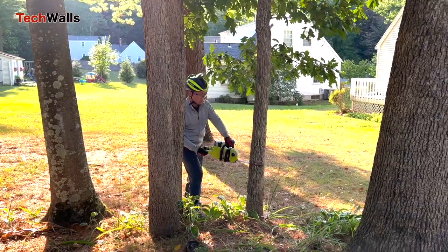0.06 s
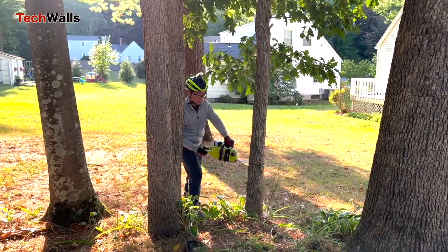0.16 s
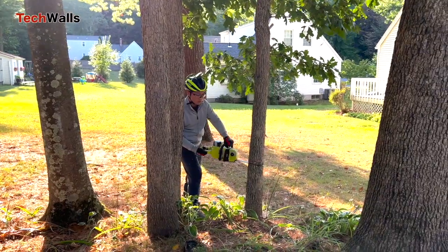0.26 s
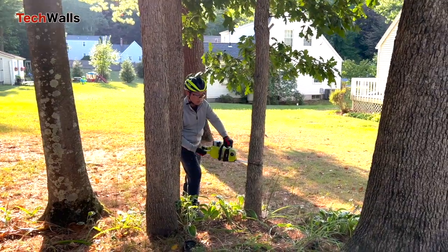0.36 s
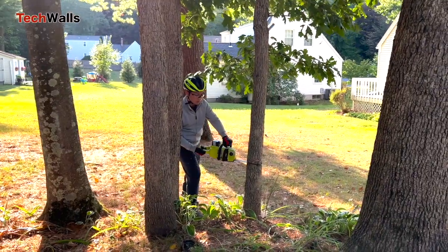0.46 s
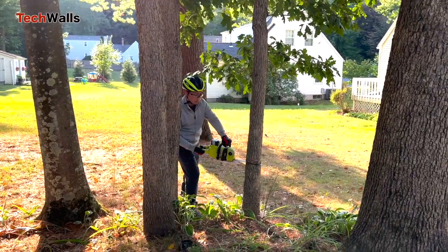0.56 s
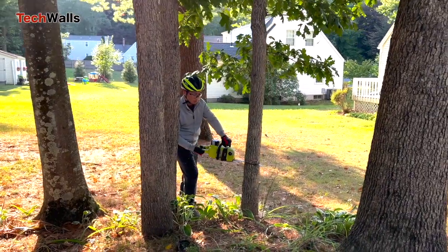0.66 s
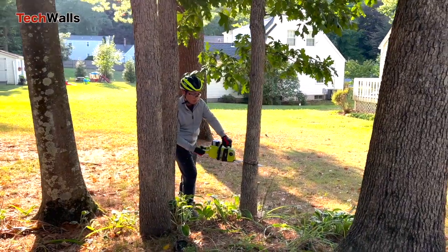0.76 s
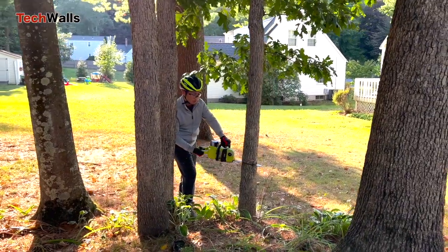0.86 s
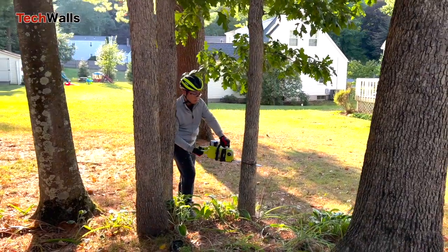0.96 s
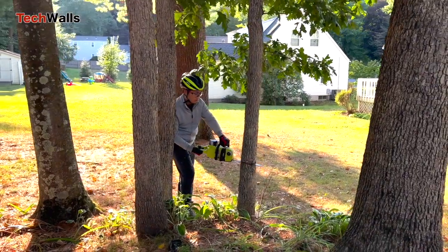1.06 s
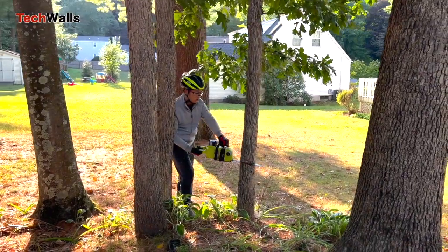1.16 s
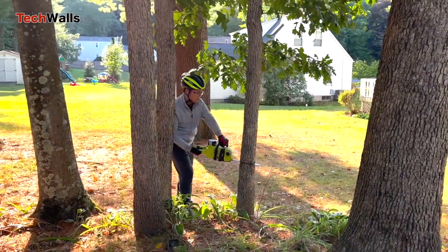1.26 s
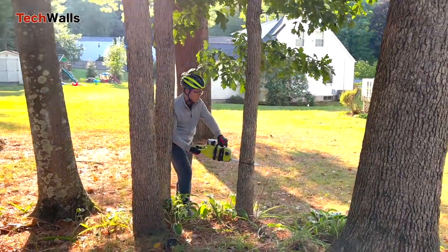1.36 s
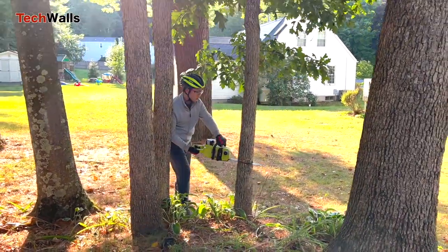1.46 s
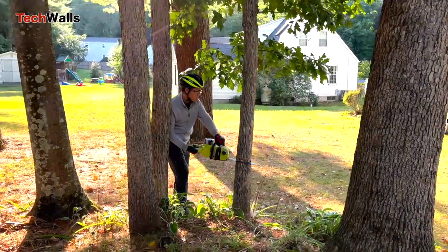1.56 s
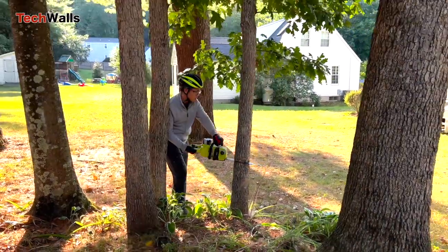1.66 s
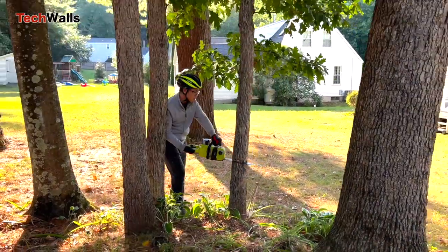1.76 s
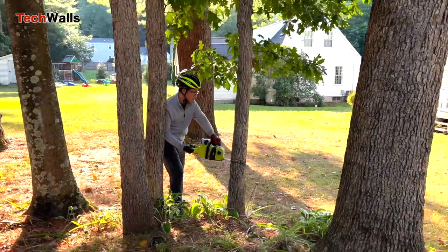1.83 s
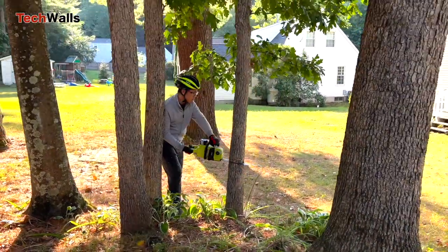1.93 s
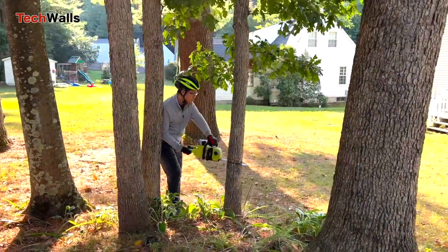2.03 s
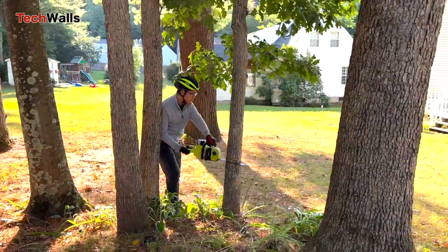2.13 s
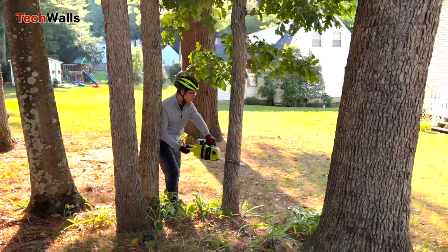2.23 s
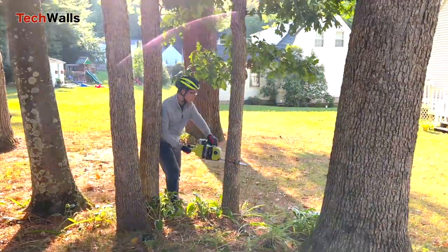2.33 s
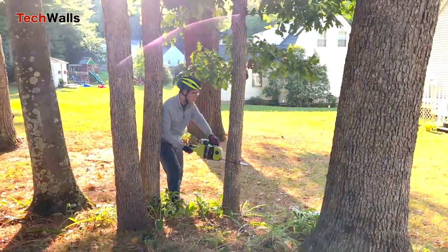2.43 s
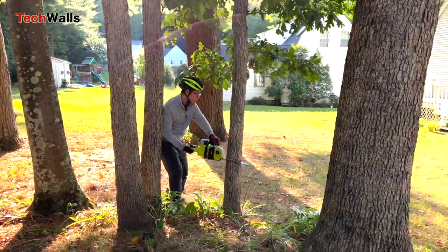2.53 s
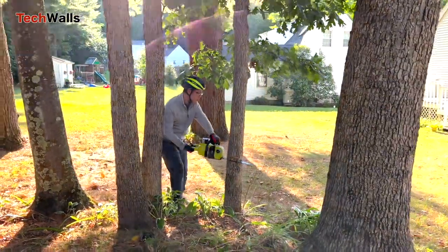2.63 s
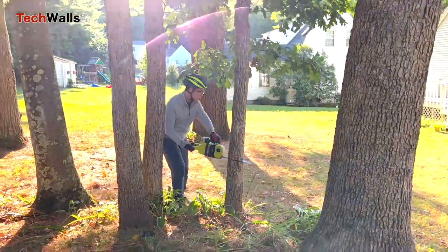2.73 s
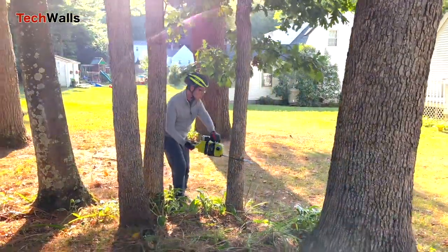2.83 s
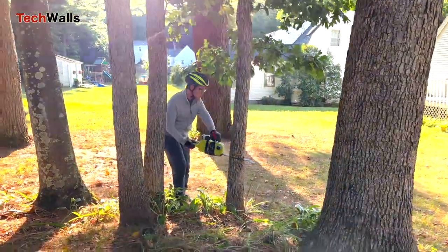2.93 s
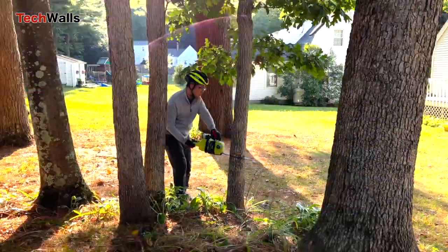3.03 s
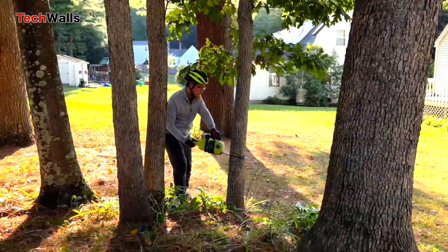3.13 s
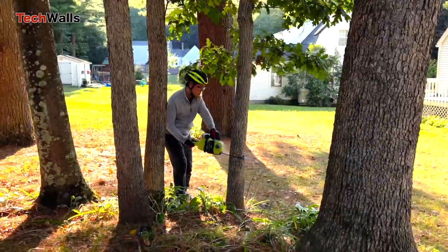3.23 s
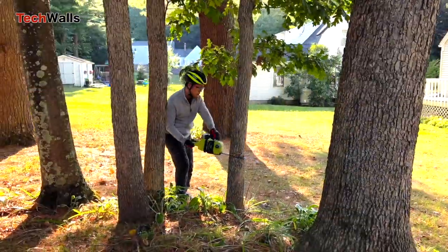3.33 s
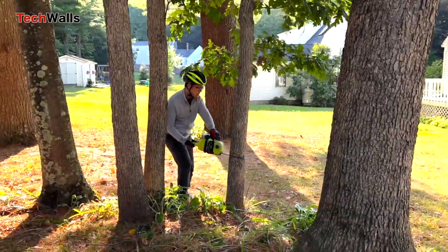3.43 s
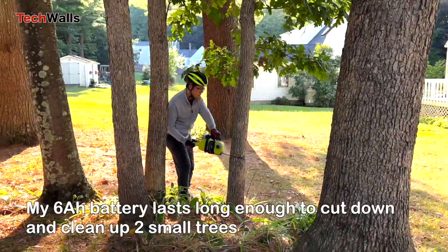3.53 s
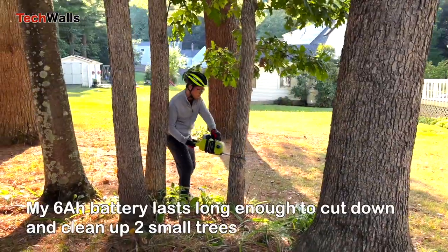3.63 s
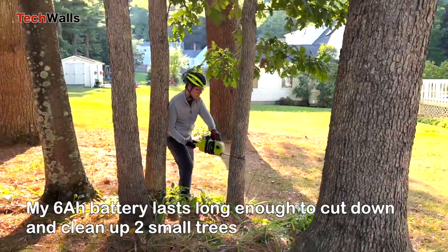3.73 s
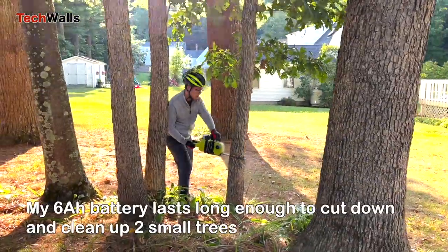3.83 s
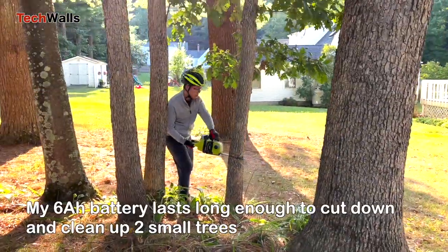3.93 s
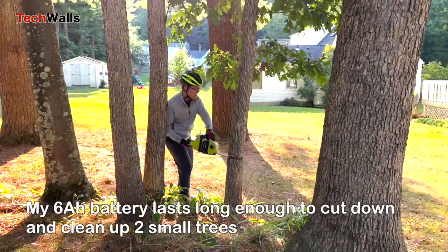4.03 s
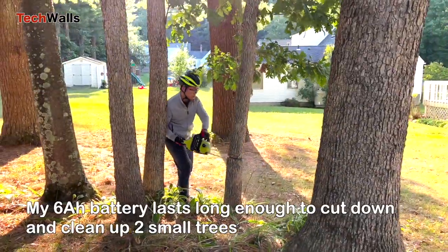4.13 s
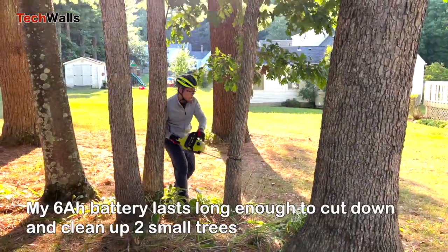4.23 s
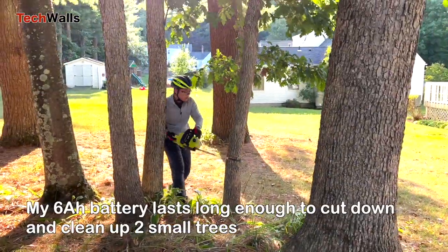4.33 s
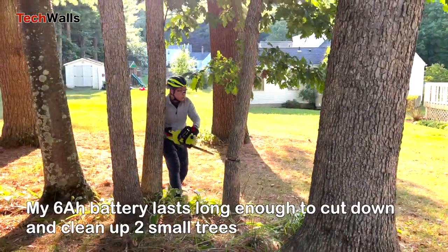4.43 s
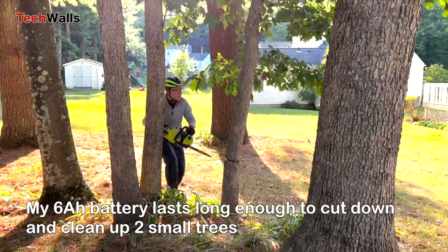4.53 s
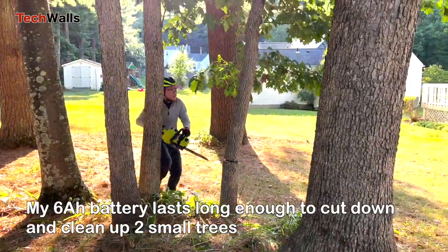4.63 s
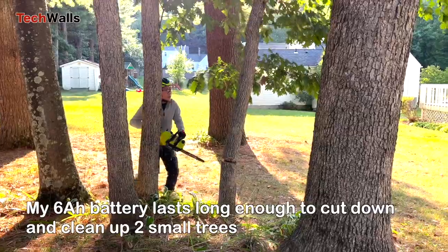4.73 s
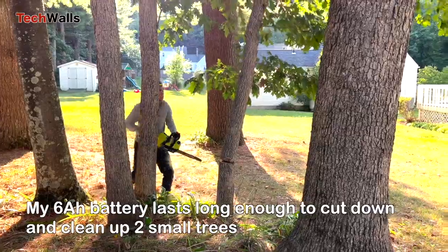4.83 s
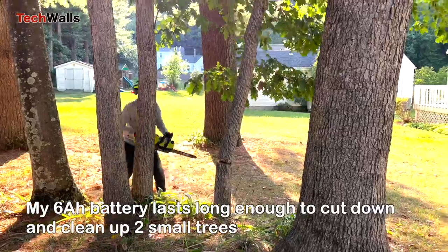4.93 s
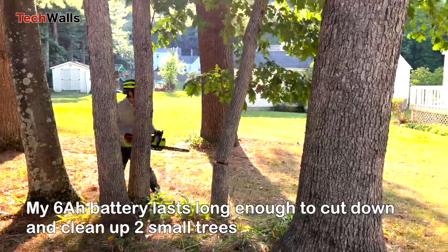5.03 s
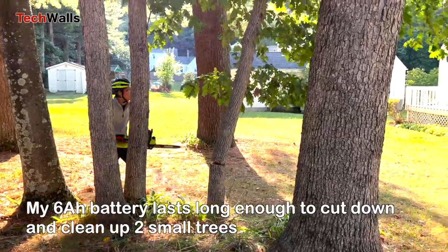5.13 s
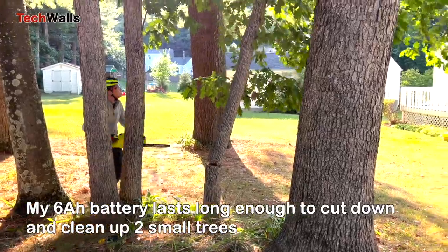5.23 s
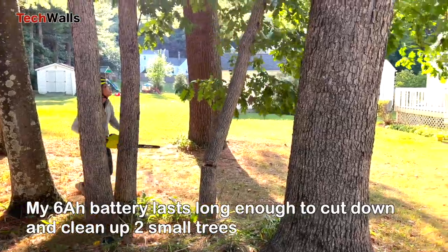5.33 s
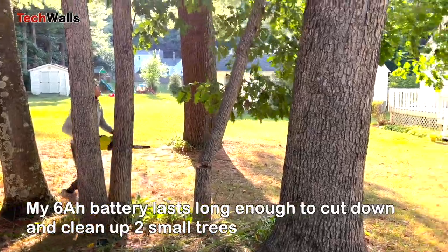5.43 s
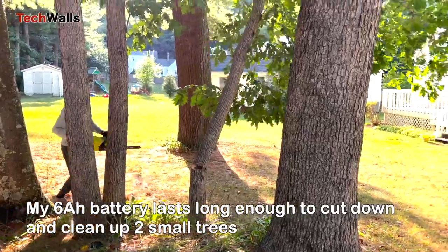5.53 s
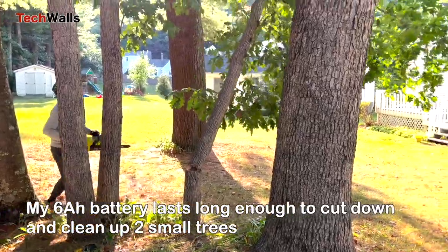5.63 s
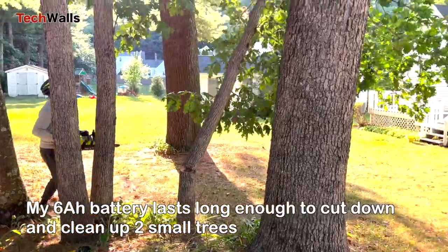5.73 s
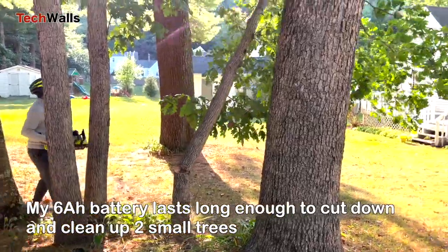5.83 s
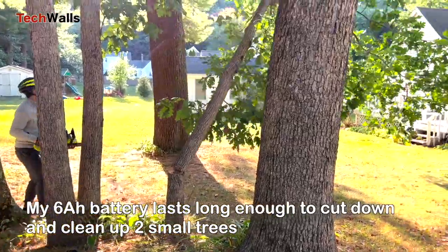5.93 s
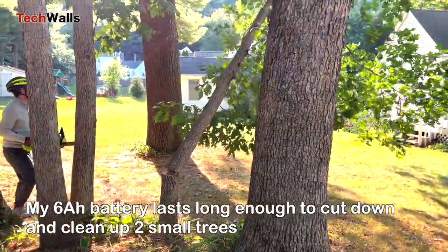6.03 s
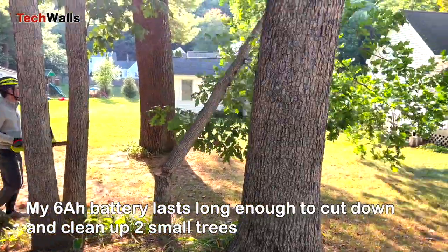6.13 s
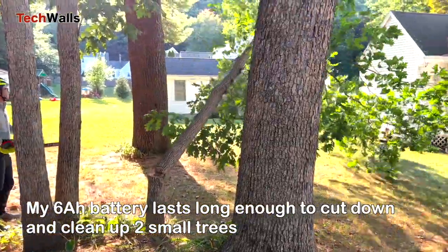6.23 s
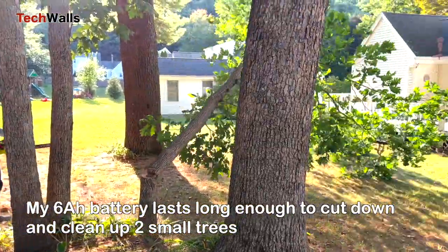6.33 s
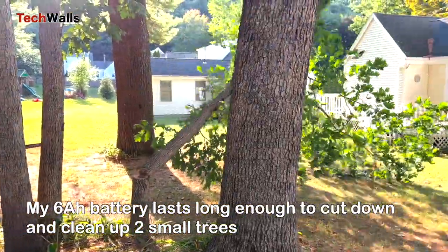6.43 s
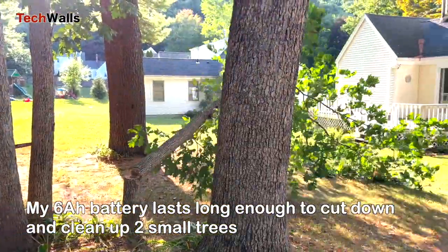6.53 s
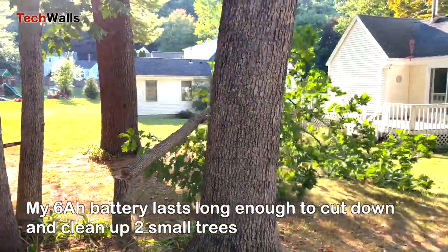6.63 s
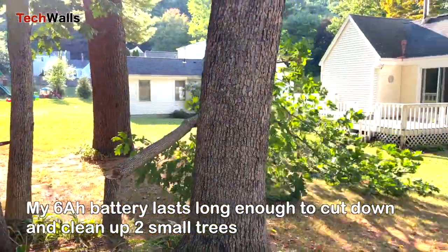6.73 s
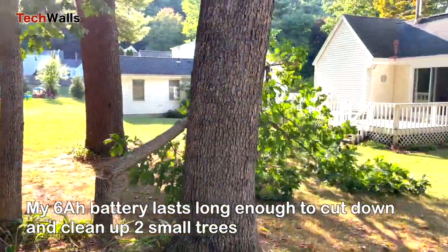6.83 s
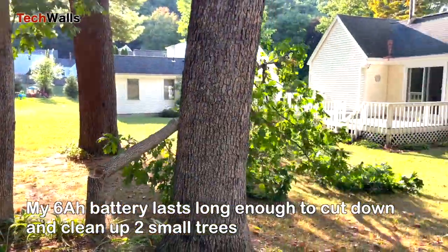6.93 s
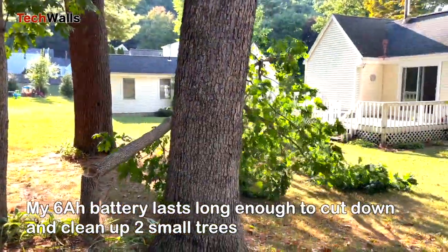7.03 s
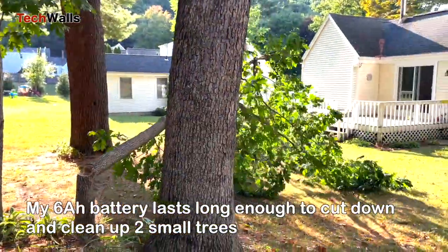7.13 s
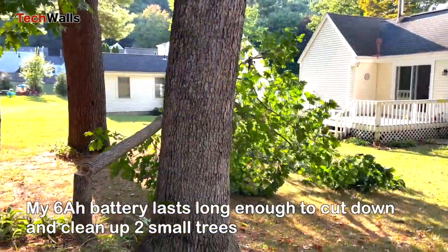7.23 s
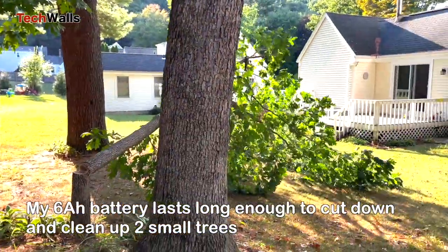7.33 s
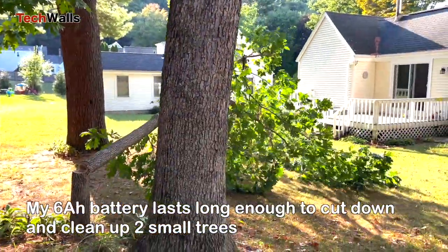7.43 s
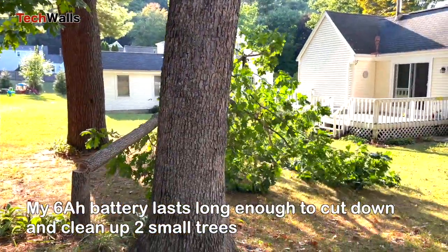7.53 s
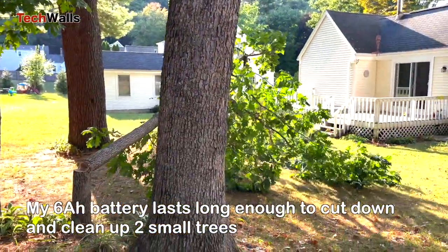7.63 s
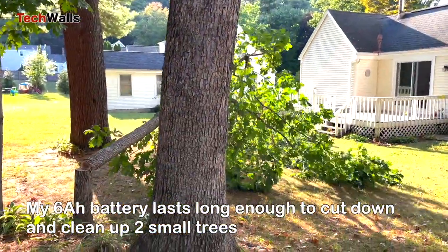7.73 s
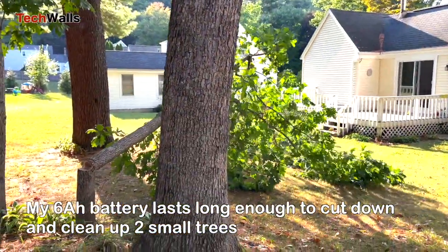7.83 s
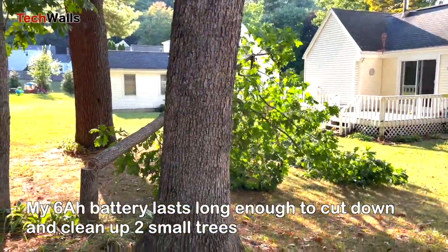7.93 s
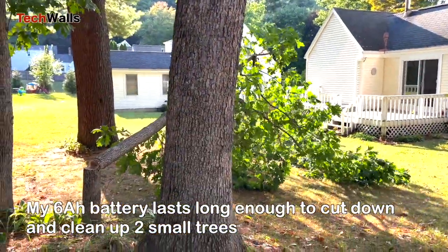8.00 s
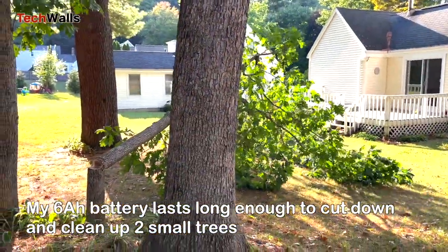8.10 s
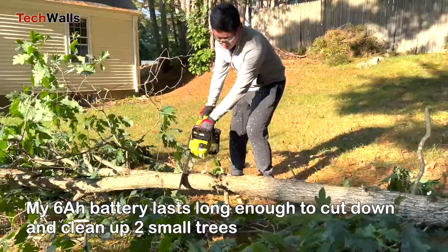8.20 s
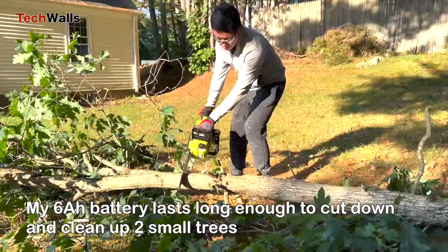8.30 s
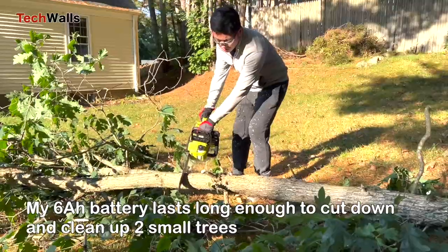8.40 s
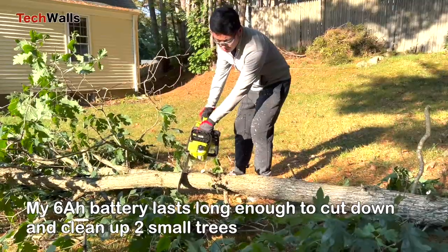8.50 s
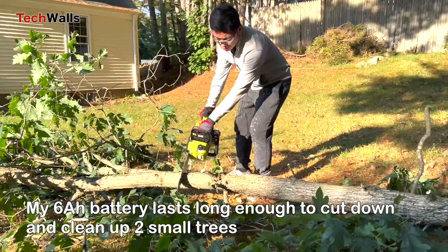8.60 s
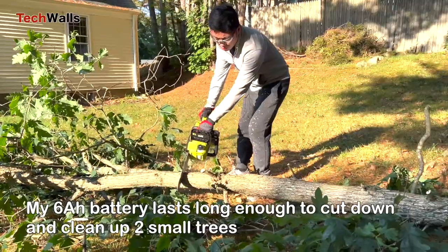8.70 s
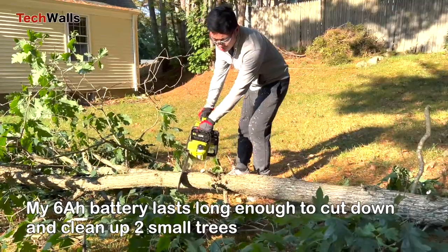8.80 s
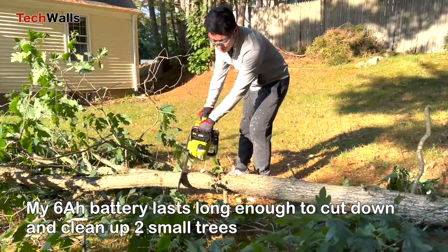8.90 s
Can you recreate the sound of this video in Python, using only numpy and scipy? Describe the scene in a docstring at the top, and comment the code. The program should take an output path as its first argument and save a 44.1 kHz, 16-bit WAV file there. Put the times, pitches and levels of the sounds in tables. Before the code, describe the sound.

From 0 to about 3.95 seconds a battery chainsaw cuts a standing young tree: a buzzing whine near 1.1 kHz, dipping slightly under load, with motor hum, rattling chain, bright gritty hiss and brief whistles. The trigger is released and the pitch slides down as the saw leaves the wood at 4.2, slack chain knocking and scraping, with soft heel thuds at 4.6 and 5.5, dying by about 5.7. Sharp wood snaps start at 5.3, crowding together from 6.0 to 6.7, with ringing woody cracks echoing off trunks and walls. Foliage rushes, swelling around 6.5 as boughs thud on grass; twigs settle around 7. Quiet yard air, faint traffic and thin insect trill remain. Dry leaves crunch and a stick knocks at 7.9-8.2. At 8.23 an abrupt cut brings loud sawing in a fallen trunk, sagging and growling around 8.45 and 8.9, until the end.

```python
"""First a battery chainsaw whines, rattles and hisses as it cuts through a young tree in a quiet yard.
The trigger is released and the chain coasts down; the tree tips, its hinge of wood snapping, its crown rushing.
A shoe crunches dry leaves, then the scene jumps to the same saw cutting up the fallen trunk.
Sine waves tied to the shaft angle make the saw's tones; shaped noise and tiny impacts make chain, leaves and yard.
Short noise bursts, passed through resonances of the trunk, make the snapping wood."""
import sys
import numpy as np
from scipy import signal
from scipy.fft import rfft, irfft, next_fast_len
from scipy.io import wavfile
from scipy.ndimage import uniform_filter1d, map_coordinates

SR = 44100
rng = np.random.default_rng(int(sys.argv[2]) if len(sys.argv) > 2 else 0)


def wav_record(signal):
    """Record a signal, one row per channel, as 16-bit PCM in the file named by sys.argv[1]."""
    frames = np.transpose(np.atleast_2d(signal))
    bounded = np.clip(frames, -1, 1)
    # unit amplitude maps onto the largest positive 16-bit level
    quanta = np.round(bounded * 32767).astype(np.int16)
    wavfile.write(sys.argv[1], SR, quanta)


N = 395136
TIME = np.arange(N) / SR
JUMP_S = 8.2345  # felling gives way to cutting up the trunk
TOP_HZ = 15850  # nothing sounds above this

# Spectra give relative levels per Hz. A swell is [peak t/s, level/dB, hold/s, rise/(dB/s), fall/(dB/s)];
# with a negative hold its fade overlaps the rise.

# Distant traffic and air: spectrum [f/Hz, level/dB]
YARD_SPECTRUM = [(20, -29), (40, -13), (58, 5.5), (78, -3), (110, 1.5), (180, -10), (350, -19.5),
                 (900, -14.5), (2000, -26), (5800, -30.5), (7200, -30), (9000, -35), (12700, -35),
                 (16000, -40)]
# Thin trill from the hedges: spectrum [f/Hz, level/dB]
INSECT_SPECTRUM = [(6600, -40), (7000, 0), (7200, 0), (7600, -40)]
# Echo of trunks and house walls [f/Hz, time to fade by 60 dB/s]
ECHO_FADE = [(200, 1), (1500, 0.35), (6000, 0.53), (14000, 0.65)]
# Stereo width [f/Hz, side against mid level/dB]
STEREO_WIDTH = [(60, -18), (380, -17.5), (700, -8.5), (1290, -2), (2400, -6), (4400, -6), (5900, 0.5),
                (7200, -8.5), (8800, -0.5), (10000, -2.5), (11200, -0.5), (12300, -3), (13300, -20),
                (15000, -1.5)]
# Dip in what both channels share [f/Hz, level/dB]
SHARED_DIP = [(8600, -0.5), (9100, -8), (9500, -61), (10350, -46), (10850, -12), (11500, 0)]

# Heels backing away over the soil [t/s, level/dB]
HEEL_STEPS = [(4.63, -43), (5.533, -48)]
# Soil under a heel: spectrum [f/Hz, level/dB]
SOIL_SPECTRUM = [(30, -4), (55, 4), (150, -10), (340, 0), (520, -10), (1200, -30)]
# Shoe crushing dry leaves [t/s, level/dB, fall/(dB/s)]
LEAF_CRUNCHES = [(7.897, -49, 350), (7.916, -49, 150), (7.93, -48, 193.5), (7.958, -62, 190),
                 (7.98, -67, 302), (8.018, -45, 600), (8.035, -60, 200), (8.146, -58, 700), (8.2, -50, 200)]
# Crushed leaves: spectrum [f/Hz, level/dB]
LITTER_SPECTRUM = [(300, -10), (1050, 2), (1700, 1), (2050, -1), (2450, -5.5), (3500, -2), (5100, -7),
                   (8000, -15), (13000, -15), (16000, -22)]
# Stick knocked underfoot [t/s, level/dB, f/Hz, time to fade by 60 dB/s]
STICK_KNOCK = (8, -37, 1000, 0.07)
CRUNCH_RISE_DB_PER_S, CRUNCH_HOLD_S = 4000, 0.0016

# Crown: the first lurch, then the sweep to the ground; swells [peak t/s, level/dB, hold/s, rise/(dB/s), fall/(dB/s)]
CROWN_SWELLS = [(5.583, -48, 0.19, 100, 62), (6.48, -38, 0.23, 36, 31)]
# Boughs thudding on the lawn: swell [peak t/s, level/dB, hold/s, rise/(dB/s), fall/(dB/s)]
LANDING_SWELL = (6.5, -45.5, 0.35, 106, 32)
# Twigs and leaves springing back: swell [peak t/s, level/dB, hold/s, rise/(dB/s), fall/(dB/s)]
SETTLING_SWELL = (7.01, -51.5, 0.11, 70, 36)
# Leaves and twigs: spectrum [f/Hz, level/dB]
LEAF_SPECTRUM = [(450, -1.5), (700, 5), (900, -11), (1150, 4), (1400, -3.5), (1700, 1), (2400, 3),
                 (4000, 0.5), (7000, -1), (9000, -4.5), (12500, -3), (15500, -2.5)]
# Boughs on the lawn: spectrum [f/Hz, level/dB]
BOUGH_SPECTRUM = [(50, -7), (130, 4.5), (300, 0.5), (600, -13), (1200, -6), (3000, -24)]

# Fibres breaking in the hinge [t/s, relative level/dB, relative ring of the trunk level/dB]
FIBRE_SNAPS = [(5.3135, -29, -17), (5.552, -24, -15), (5.5735, -32, -26), (5.6059, -27, -17),
               (5.6332, -25, -22), (5.685, -20.5, -28), (5.6915, -27, -16), (5.713, -23, -25),
               (5.8269, -20, -16), (5.8536, -22.5, -10), (6.0127, -32, -28), (6.046, -23, -22),
               (6.072, -30, -21), (6.0896, -28, -17), (6.109, -28, -13), (6.1255, -23, -16),
               (6.137, -25, -13), (6.1707, -19.5, -17), (6.181, -20, -10.5), (6.225, -26, -19),
               (6.247, -28, -16), (6.264, -20, -16), (6.318, -22, -11), (6.3283, -22.5, -7),
               (6.331, -19.5, -2), (6.3334, -23, -1), (6.3897, -18, -12.5), (6.427, -14.5, -11),
               (6.469, -22, -11), (6.5208, -18, -13), (6.524, -14.5, -6.5), (6.675, -24.5, -6.5),
               (6.719, -17, -16)]
# Resonances of the trunk [f/Hz, width/Hz, level/dB]
TRUNK_MODES = [(1080, 320, -13), (1660, 170, -5), (2260, 220, 0), (2700, 200, -3), (3260, 200, -6),
               (3750, 200, -10), (4290, 300, -8.5), (5360, 300, -12), (6890, 260, -15)]
# Edge of the cracks: spectrum [f/Hz, level/dB]
CRACK_SPECTRUM = [(500, -7), (2000, -4), (6000, 0.5), (9000, 0), (13000, 8.5), (16000, 0)]
# Small fibres ticking as the hinge bends: swell [peak t/s, level/dB, hold/s, rise/(dB/s), fall/(dB/s)]
STRAIN_SWELL = (6.5, -38.5, -0.36, 16, 65)
TICK_CRACK_DB = -7  # sharp edge of the small ticks against their woody ring

# Saw in the lying trunk [t/s, shaft speed f/Hz, whine level/dB, relative motor whistle level/dB]
BUCKING_RUN = [(8.235, 177.1, -30.5, -37), (8.41, 165, -37, -29), (8.455, 165, -41, -29),
               (8.57, 179.6, -28, -43), (8.65, 181, -27.5, -49), (8.77, 180.4, -28, -40),
               (8.89, 169.5, -40, -30), (8.96, 172.2, -33, -40)]
# Chain and chips in the lying trunk: spectrum [f/Hz, level/dB]
BUCKING_SPECTRUM = [(100, -58), (250, 0.5), (420, -18.5), (560, -9), (770, 13), (950, -9), (1250, -1),
                    (1450, -6.5), (1950, -7.5), (2400, -7.5), (3000, -12.5), (3700, -5), (4300, -7),
                    (4900, -6.5), (5600, -10.5), (6500, -7), (8700, -14), (12700, -0.5), (15500, -5)]
# Growl in a deep bite [f/shaft speed, level/dB]
GROWL_ORDERS = [(4, -35.5), (9, -42), (12, -38.5)]
BUCK_EASY_HZ, BUCK_SAG_HZ = 181, 15  # shaft speed in a light bite, its sag in a deep one

# Motor tones [f/shaft speed, level against the motor/dB]
MOTOR_ORDERS = [(2, -24), (4, -16), (5, -32), (8, -18), (9, -18.5), (14, -25), (18, -27), (22, -22.5),
                (24, -23.5)]
# Brief whistles of motor and coasting chain at multiples of the shaft speed
# [t/s, half length/s, f/shaft speed, level/dB]
SHAFT_WHISTLES = [(.25, 0.45, 18, -39.5), (.35, 1, 5, -36.5), (0.453, 0.85, 4, -41), (1.0, 0.35, 9, -34.5),
                  (1.2, 0.1, 24, -40), (1.505, 0.27, 18, -40), (2.404, 0.044, 14, -35),
                  (2.72, 0.087, 12, -44), (3.0, .11, 12, -36.5), (3.096, 0.33, 18, -42),
                  (3.24, 0.15, 24, -35), (3.241, .05, 12, -34), (3.75, 0.2, 12, -43.5),
                  (3.6, 0.32, 9, -39.5), (4.049, 0.047, 4, -30.5), (4.18, 0.075, 12, -45),
                  (4.42, .05, 16, -43), (4.576, 0.072, 18, -39), (4.82, .04, 24, -42),
                  (4.871, 0.057, 18, -41), (5.236, 0.056, 16, -44.5)]
# Felling speed, sagging whenever the cutters bite [t/s, shaft speed f/Hz]
FELLING_SPEED = [(0.0, 191.1), (0.05, 193.9), (0.36, 190.5), (0.62, 192.4), (0.7, 192.6), (0.77, 186.6),
                 (1.0, 193.8), (1.22, 184.5), (1.43, 192.4), (1.65, 192.6), (1.81, 194.2), (1.97, 187.4),
                 (2.07, 191.9), (2.28, 184.5), (2.39, 172.2), (2.52, 183.1), (2.71, 180.8), (3.04, 187.2),
                 (3.29, 183.7), (3.46, 187.4), (3.58, 185.8), (3.76, 190), (3.94, 189.8)]
# Force of the links on the sprocket, before the housing resonates [t/s, level/dB]
WHINE_FORCE = [(0, -27), (.18, -23.5), (.5, -32.5), (.72, -30.5), (.82, -25.5), (1.1, -26.5), (1.6, -21),
               (2.35, -27), (2.52, -23), (3.02, -22), (3.3, -23.5), (3.88, -21), (4.15, -28.5), (4.33, -30),
               (4.55, -25), (4.66, -28.5), (4.87, -29.5), (4.98, -52.5), (5.3, -50), (5.5, -72)]
# Resonances of the housing [f/Hz, width/Hz, level/dB]
HOUSING_MODES = [(336, 85, -5), (669, 57, 6), (1065.5, 186, 2.5), (1530.5, 98, 4.5), (1655, 36, -9),
                 (2060, 110, -1.5), (2630, 160, -3), (3030, 121, -2.5), (3500, 190, -4), (3980, 210, -3.5)]
# Narrow peaks that colour the hiss [f/Hz, width/Hz, level/dB]
HISS_PEAKS = [(2630, 230, 4), (2980, 125, -1), (3500, 110, -0.5), (3936, 110, 2.5), (4400, 35, 0),
              (5020, 160, -6.5), (7744, 54, -14)]
# Narrow singing band near 4 kHz: spectrum [f/Hz, level/dB]
SONG_SPECTRUM = [(3700, -45), (3900, -5), (4000, 1), (4090, 7), (4300, -45)]
# The singing band swells during the cut [peak t/s, level/dB, hold/s, rise/(dB/s), fall/(dB/s)]
SONG_SWELL = (2.5, -41, 0.5, 12, 29)
# Housing and guide bar struck by the chain: spectrum [f/Hz, level/dB]
RATTLE_SPECTRUM = [(120, -29.5), (270, -16), (440, -17), (570, -1), (720, 0.5), (880, -6), (1080, 3),
                   (1350, -11), (1600, -2.5), (1870, -12), (2200, -6), (2800, -22.5), (4000, -25),
                   (8000, -60)]
# Cutters in the wood and links in the groove: spectrum [f/Hz, level/dB]
HISS_SPECTRUM = [(800, -30), (2400, -15.5), (3200, -4), (4100, -3), (4900, -1), (5500, -5), (6600, -1.5),
                 (7800, -1), (9000, -3.5), (11000, -1.5), (12600, 4), (14000, 5), (15500, -5.5)]
# Standing stem under the cutters: spectrum [f/Hz, level/dB]
STEM_SPECTRUM = [(110, -39), (170, 0), (215, -8), (270, 1.5), (340, -10), (420, 0.5), (600, -43)]
# The saw's bounce off the ground [t/s, delay/ms]
GROUND_DELAY = [(0, 1.8), (1.6, 2.53), (2.4, 2.1), (3.0, 2.2), (3.9, 2.26), (4.5, 1.93), (5.3, 1.93)]
# Slow chain slapping the bar: spectrum [f/Hz, level/dB]
SLAP_SPECTRUM = [(150, -27), (270, -11), (335, 9.5), (400, -4), (620, -3), (800, -8), (1100, 3),
                 (1350, -19), (1650, -19), (2300, -32)]
# Last slow turns of the chain: swell [peak t/s, level/dB, hold/s, rise/(dB/s), fall/(dB/s)]
LAST_TURNS_SWELL = (5.5, -49, -0.05, 7, 32)
# Slack chain scraping the groove: swells [peak t/s, level/dB, hold/s, rise/(dB/s), fall/(dB/s)]
SCRAPE_SWELLS = [(4.451, -39, .06, 57, 60), (5.0, -49, .015, 200, 150), (5.198, -49.5, 0.042, 60, 150)]
# Groove of the bar: spectrum [f/Hz, level/dB]
GROOVE_SPECTRUM = [(1500, -22), (2100, -4), (2600, 0), (3500, 5), (4400, -8), (6200, 1), (8500, -11),
                   (13000, -4), (15500, -6)]

TEETH, CHAIN_LINKS = 6, 52  # links that strike the sprocket in a turn, links in the whole chain
RELEASE_S, FREE_S, STOP_S = 3.95, 4.21, 5.25  # trigger let go, bar leaves the wood, chain starts to settle
WOOD_DRAG_PER_S, FREE_DRAG_PER_S, FRICTION_HZ_PER_S = 1.55, .85, 20  # what slows the shaft
IDLE_HZ, FULL_LOAD_SAG_HZ = 195.4, 15.3  # shaft speed unloaded, its sag in a deep bite
SLACK_HZ = 85.5  # shaft speed where the chain goes slack
SETTLE_DB_PER_S = 5.5  # fade of the chain noise as it settles
# In the settings below, LOAD is the change at full load, FREE the change out of the wood,
# SLOW the change per halving of speed and SLACK the change per halving once the chain is slack.
TONES_SLACK_DB = -9.5  # motor and octave
DRONE_DB, DRONE_LOAD_DB = -30.5, -12  # low drone of link pairs and shaft
OCTAVE_DB, OCTAVE_LOAD_DB, OCTAVE_SLOW_DB = -48, 4, 1  # an octave above the sprocket whine
MOTOR_DB, MOTOR_FREE_DB, MOTOR_SLOW_DB = -22.5, -11.5, -5
HISS_DB, HISS_LOAD_DB, HISS_SLOW_DB = -25.5, 1, -10
RATTLE_DB, RATTLE_LOAD_DB, RATTLE_FREE_DB, RATTLE_SLACK_DB = -29.5, 1.5, -4.5, -10
RING_DB, RING_SLACK_DB = -33.5, -20.5  # housing rung by the coasting chain
CHAIN_SLACK, LINK_CLATTER = .05, 1.5  # uneven run (radians), link knocks against overtones (ratio)
SURGE_DB = 2  # the slack chain tightens and sags twice a lap


def amp(db):
    """Turn decibels into a gain."""
    return 10 ** (np.asarray(db) / 20)


def unit(x):
    """Scale a sound to an average (rms) strength of 1."""
    return x / np.sqrt(np.mean(x ** 2) + 1e-20)


def along(points, hz):
    """Read (frequency, value) points on a log frequency axis."""
    f, v = np.transpose(points)
    return np.interp(np.log(hz + 1), np.log(f), v)


def curves(rows):
    """Join the points of each column after the time by straight lines over time."""
    s, *cols = np.transpose(rows)
    return [np.interp(TIME, s, c) for c in cols]


def since(s):
    """Seconds after s, 0 before it."""
    return np.maximum(TIME - s, 0)


def swell(peak_s, db, hold_s, rise, fall):
    """Gain that rises, holds and dies away; slopes in dB per second."""
    rising_db = rise * np.maximum(peak_s - TIME, 0)
    return amp(db - rising_db - fall * since(peak_s + hold_s))


def wobble(rate, order=2):
    """A smooth random curve of rms 1 with rate knots a second."""
    coarse = np.append(TIME[::32], TIME[-1])
    knots = rng.standard_normal(int(N * rate / SR) + 4)
    curve = map_coordinates(knots, [coarse * rate], order=order)
    return np.interp(TIME, coarse, unit(curve))


def filtered(x, response):
    """Shape the spectrum of x by a response that depends on frequency."""
    m = next_fast_len(N + SR // 8, True)
    hz = np.fft.rfftfreq(m, 1 / SR).astype(np.float32)
    gain = np.asarray(response(hz), np.complex64)
    return irfft(rfft(x.astype(np.float32), m) * gain, m)[..., :N].astype(float)


def resonances(modes, hz):
    """Response of a body that rings at each (frequency, width, level)."""
    return sum(amp(db) * 1j * hz * w / (c * c - hz * hz + 1j * hz * w) for c, w, db in modes)


def levelled(x):
    """Hold the rms near 1 over each quarter second."""
    return x / np.sqrt(np.abs(uniform_filter1d(x ** 2, SR // 4)) + 1e-6)


def spread(pair, spectrum):
    """Colour two unrelated signals and mix them into stereo, its width set for each frequency."""
    def response(hz):
        widths = np.array([np.ones_like(hz), amp(along(STEREO_WIDTH, hz))])
        return amp(along(spectrum, hz)) * widths
    mid, side = filtered(pair, response)
    return np.array([mid + side, mid - side]) / np.sqrt(np.mean(mid ** 2))


def noise(spectrum):
    """Smooth stereo noise whose shared part has rms 1."""
    return spread(rng.standard_normal((2, N)), spectrum)


def grains(spectrum, rate, size_db, share):
    """Tiny impacts of scattered size, rate a second, on a bed of noise; share is their part of the power."""
    sizes = amp(size_db * np.minimum(rng.exponential(size=N), 3))
    hits = (rng.random(N) < rate / SR) * sizes
    share = np.clip(share, 0, 1)
    impacts = unit(hits) * rng.choice([-1, 1], (2, N))
    bed = rng.standard_normal((2, N))
    return spread(np.sqrt(1 - share) * bed + np.sqrt(share) * impacts, spectrum)


def yard_echo(x, wet_db):
    """Add to a mono source its scattered answer from trunks and walls: a fading noise tail."""
    hz, t, z = signal.stft(rng.standard_normal((2, SR // 3)), SR, nperseg=256)
    fade = amp(-60 * t / along(ECHO_FADE, hz)[:, None])
    tail = signal.istft(z * fade, SR, nperseg=256)[1]
    tail = tail / np.linalg.norm(tail[0])
    return x + amp(wet_db) * signal.fftconvolve(x[None], tail, axes=1)[:, :N]


def yard():
    """Distant traffic and air: steady low noise whose level drifts slightly."""
    return amp(-49.0 + 0.47 * wobble(4.34)) * noise(YARD_SPECTRUM)


def insects():
    """A thin trill from the hedges: a narrow band of high noise."""
    return amp(-68.5) * noise(INSECT_SPECTRUM)


def steps():
    """Heels thud on soil as short low noise; later a shoe crushes leaves in grains and a stick rings as a sine."""
    press = sum(swell(s, db, CRUNCH_HOLD_S, CRUNCH_RISE_DB_PER_S, fall) for s, db, fall in LEAF_CRUNCHES)
    heels = sum(swell(s, db, hold_s=.008, rise=1600, fall=400) for s, db in HEEL_STEPS)
    leaves = grains(LITTER_SPECTRUM, rate=480, size_db=1.0, share=0.8)
    s, db, hz, t60 = STICK_KNOCK
    stick_gain = amp(db - 60 * np.minimum(since(s) / t60, 2))
    stick = stick_gain * np.sin(2 * np.pi * hz * since(s))
    return press * leaves + heels * noise(SOIL_SPECTRUM) + stick


def falling():
    """1 while the tree is on the move, 0 before and after, with ramps between."""
    return np.interp(TIME, [5.35, 5.55, 7.3, 7.8], [0, 1, 1, 0])


def crown():
    """Leaves and twigs crackle as the tree sweeps down, boughs thud on the lawn, and the foliage settles."""
    sweep = np.sqrt(sum(swell(*row) ** 2 for row in CROWN_SWELLS))
    leaves = grains(LEAF_SPECTRUM, rate=1000, size_db=1.5, share=0.5)
    rush = sweep * amp(1.5 * wobble(70)) * leaves
    twigs = swell(*SETTLING_SWELL) * grains(LEAF_SPECTRUM, rate=300, size_db=2.0, share=.75)
    boughs = swell(*LANDING_SWELL) * grains(BOUGH_SPECTRUM, rate=70, size_db=1.0, share=0.58)
    return falling() * rush + twigs + boughs


def hinge():
    """Each snap is a sharp crack and a short tearing burst that rings the trunk; small fibres tick in between."""
    ticks = (rng.random(N) < 150 / SR) * rng.uniform(-1, 1, N)
    tears = falling() * swell(*STRAIN_SWELL) * unit(ticks)
    cracks = amp(TICK_CRACK_DB) * tears * rng.uniform(-1.7, 1.75, (2, N))
    t = np.arange(SR // 20) / SR
    crack_fade = amp(-60 * t / 0.0037) + 0.029 * amp(-60 * t / 0.04)
    tear_fade = amp(-60 * t / 0.012)
    for s, db, ring_db in FIBRE_SNAPS:
        start = round(s * SR)
        at = slice(start, start + len(t))
        burst = rng.standard_normal((3, len(t)))
        burst[:, 0] = 2  # the fibre parts all at once
        cracks[:, at] += amp(db - 6) * crack_fade * burst[:2]
        tears[at] += amp(db + ring_db + 15.0) * tear_fade * burst[2]
    mid, side = filtered(cracks, lambda hz: amp(along(CRACK_SPECTRUM, hz)))
    wood = filtered(tears, lambda hz: resonances(TRUNK_MODES, hz))
    return yard_echo(mid + wood, wet_db=-2.5) + 1.03 * np.array([side, -side])


def shaft(speed_hz, jitter):
    """Add up the turning speed into an angle; small random jogs stand for the cutters' bites."""
    return 2 * np.pi * np.cumsum(speed_hz * (1 + jitter * wobble(70))) / SR


def halvings(speed_hz, from_hz):
    """How many times the speed has halved below from_hz."""
    return np.maximum(np.log2(from_hz / speed_hz), 0)


def motor(angle, flutter):
    """Sine tones at multiples of the shaft speed, each with its own random flutter."""
    turn = (angle % (2 * np.pi)).astype(np.float32)
    tones = 0
    for k, db in MOTOR_ORDERS:
        tone = np.sin(round(k) * turn + rng.uniform(0, 2 * np.pi))
        tones = tones + amp(db) * (1 + flutter * wobble(22)) * tone
    return np.sqrt(2) * tones


def sprocket(angle, rough):
    """Six drive links a turn strike the sprocket, never quite equally: a sine roughened at random."""
    steady = (1 + rough * wobble(90)) * np.sin(TEETH * angle)
    uneven = rough * wobble(60) * np.cos(TEETH * angle)
    return np.sqrt(2) * (steady + uneven)


def chatter(angle, depth):
    """Gain that makes chain noise pulse with the links and twice a shaft turn."""
    return 1 + depth * (np.cos(TEETH * angle) + np.cos(2 * angle))


def shaft_whistles(angle):
    """Short wavering whistles at multiples of the shaft speed; they blur once the chain coasts."""
    waver = np.interp(TIME, [RELEASE_S, STOP_S], [.022, .11]) * wobble(80)
    turn = ((angle + waver) % (2 * np.pi)).astype(np.float32)
    time = TIME.astype(np.float32)
    whistles = 0
    for s, length, k, db in SHAFT_WHISTLES:
        bell = np.exp(-np.minimum(((time - s) / length) ** 2, 20))
        whistles = whistles + amp(db) * bell * np.sin(round(k) * turn)
    return np.sqrt(2) * whistles


def link_knocks(angle, scatter_db):
    """One knock of uneven strength for each passing link, scaled to keep its power at any speed."""
    passing = np.diff(np.floor(TEETH * angle / (2 * np.pi)), prepend=0) > 0
    strengths = amp(scatter_db * np.clip(rng.standard_normal(N), -2, 2))
    sizes = rng.choice([-1, 1], N) * strengths
    links_per_sample = TEETH * np.gradient(angle) / (2 * np.pi)
    return unit(sizes) * passing / np.sqrt(links_per_sample)


def surge(angle):
    """Gain of the slack chain's uneven run round the bar."""
    lap = TEETH * angle / CHAIN_LINKS
    return amp(SURGE_DB * np.sin(2 * lap + wobble(8.7)))


def coasting(angle, level_db, count=24):
    """Overtones of the slack chain slide down through the housing's resonances while single links knock."""
    released = np.clip(since(RELEASE_S) / 0.04, 0, 1)
    swing = 3 * (angle + CHAIN_SLACK * wobble(70))  # three link pairs a turn; uneven running blurs high overtones
    ladder = 0
    for k in range(3, 3 + count):
        phase = (k * swing + rng.uniform(0, 2 * np.pi)).astype(np.float32)
        ladder = ladder + (1 if k % 2 == 0 else .7) * np.sin(phase)
    blows = unit(ladder) + LINK_CLATTER * link_knocks(angle, scatter_db=2)

    def housing(hz):
        response = resonances(HOUSING_MODES, hz)
        return response * np.abs(response)  # squared strength makes the peaks stand out
    ring = levelled(filtered(blows, housing))
    slap = levelled(filtered(blows, lambda hz: amp(along(SLAP_SPECTRUM, hz))))
    return surge(angle) * (released * amp(level_db) * ring + swell(*LAST_TURNS_SWELL) * slap)


def scrapes():
    """The coasting chain rubs its groove as the saw is swung clear: brief swells of gritty noise."""
    rub = sum(swell(*row) for row in SCRAPE_SWELLS)
    return rub * grains(GROOVE_SPECTRUM, rate=700, size_db=4.0, share=0.53)


def grounded(x, bounce):
    """Add the bounce off the ground, whose delay shifts as the saw moves."""
    delay_ms, = curves(GROUND_DELAY)
    late_s = TIME - (delay_ms + .03 * wobble(5)) / 1000
    return x + bounce * np.array([np.interp(late_s, TIME, side) for side in x])


def bucking():
    """The saw in the lying trunk growls in each deep bite; a bounce off the ground combs its noise."""
    speed_hz, whine_db, whistle_db = curves(BUCKING_RUN)
    angle = shaft(speed_hz, jitter=0.00286)
    load = np.clip((BUCK_EASY_HZ - speed_hz) / BUCK_SAG_HZ, 0, 1)
    poles = 14  # the motor whistles at this multiple of the shaft speed
    whistle = amp(whistle_db - 5.0) * np.sqrt(2) * (1 + 0.24 * wobble(70)) * np.sin(poles * angle)
    hum = amp(whine_db - 15.0) * np.sqrt(2) * np.sin(2 * angle)
    bites = sum(amp(db) * np.sin(round(k) * angle + .5 * wobble(90)) for k, db in GROWL_ORDERS)
    growl = load * np.sqrt(2) * bites
    whine = amp(whine_db) * sprocket(angle, rough=0.19)
    drone = amp(-44) * sprocket(angle / 2, rough=0.26)
    tones = whine + whistle + hum + growl + drone + amp(-29.0) * motor(angle, flutter=0.71)
    chips = grains(BUCKING_SPECTRUM, rate=2200, size_db=0.0, share=0.34)
    chain = amp(-22.3 + 0.58 * wobble(90)) * chips * chatter(angle, depth=0.095)
    ground_s, bounce = .001965, .64  # delay and strength of the bounce

    def ground(hz):
        # grass swallows the treble of the bounce
        return 1 + bounce * np.exp(-(hz / 6900) ** 4 - 2j * np.pi * hz * ground_s)
    chain = filtered(chain, ground)
    return (chain + yard_echo(tones, wet_db=-30)) * amp([[.3], [-.3]])  # a touch to the left


def felling_speed():
    """Shaft speed driven through the cut, braked by the wood, then coasting against drag and friction."""
    driven_hz, = curves(FELLING_SPEED)
    braked_hz = driven_hz * np.exp(-WOOD_DRAG_PER_S * (since(RELEASE_S) - since(FREE_S)))
    friction_hz = FRICTION_HZ_PER_S / FREE_DRAG_PER_S
    coasting_hz = (braked_hz + friction_hz) * np.exp(-FREE_DRAG_PER_S * since(FREE_S)) - friction_hz
    return np.maximum(coasting_hz, 1)


def felling_tones(angle, speed_hz, load, free):
    """The whine flares as it crosses the housing's resonances; load trades the low drone for the octave."""
    force_db, = curves(WHINE_FORCE)
    slow = halvings(speed_hz, IDLE_HZ)
    # the slacker the chain, the less evenly it meshes
    ragged = .1 + .22 * np.clip(halvings(speed_hz, 1.3 * SLACK_HZ), 0, 1.5)
    flare = np.abs(resonances(HOUSING_MODES, TEETH * speed_hz))
    whine = amp(force_db + 0.62 * wobble(12)) * flare * sprocket(angle, rough=ragged)
    pairs = sprocket(angle / 2, rough=0.042) + amp(-6.5) * np.sin(4 * angle)
    drone = (1 - free) ** 2 * amp(DRONE_DB + DRONE_LOAD_DB * load) * pairs
    octave_load_db = OCTAVE_LOAD_DB * load * np.clip(1 - 2 * free, 0, 1)
    octave = amp(OCTAVE_DB + octave_load_db + OCTAVE_SLOW_DB * slow) * sprocket(2 * angle, rough=0.17)
    hum = amp(MOTOR_DB + MOTOR_FREE_DB * free + MOTOR_SLOW_DB * slow) * motor(angle, flutter=0.32)
    fade = amp(TONES_SLACK_DB * halvings(speed_hz, SLACK_HZ)) * np.interp(TIME, [FREE_S, STOP_S], [1, .3])
    return whine + drone + fade * (octave + hum)


def felling():
    """The saw in the standing tree: speed and load set tones, rattle and hiss; the stem rumbles until it is free."""
    speed_hz = felling_speed()
    angle = shaft(speed_hz, jitter=.003)
    load = np.clip((IDLE_HZ - speed_hz) / FULL_LOAD_SAG_HZ, 0, 1)
    free = np.interp(TIME, [RELEASE_S, FREE_S], [0, 1])  # 0 in the wood, 1 out of it
    cutting = load * (1 - free)
    loose = halvings(speed_hz, SLACK_HZ)
    settle_db = -SETTLE_DB_PER_S * since(STOP_S)
    tones = felling_tones(angle, speed_hz, load, free)

    rattle_db = RATTLE_DB + RATTLE_LOAD_DB * cutting + RATTLE_FREE_DB * free + RATTLE_SLACK_DB * loose + settle_db
    rattle_gain = amp(rattle_db + (1.38 - 0.38 * free) * wobble(45))
    rattle = rattle_gain * grains(RATTLE_SPECTRUM, rate=1500, size_db=-1.5, share=0.37)
    stem = (1 - free) * amp(-51.5 + 3.3 * wobble(12)) * noise(STEM_SPECTRUM)

    rasp = grains(HISS_SPECTRUM, rate=2500, size_db=2.0, share=0.27)
    rasp = filtered(rasp, lambda hz: 1 + resonances(HISS_PEAKS, hz))
    hiss_db = HISS_DB + HISS_LOAD_DB * cutting + HISS_SLOW_DB * halvings(speed_hz, IDLE_HZ) + settle_db
    hiss = amp(hiss_db + 0.68 * wobble(60)) * grounded(rasp, bounce=0.26)

    song = swell(*SONG_SWELL) * amp(2.1 * wobble(18)) * noise(SONG_SPECTRUM)
    ring = coasting(angle, RING_DB + RING_SLACK_DB * loose + settle_db)
    body = yard_echo(tones + shaft_whistles(angle), wet_db=-15.5) + rattle + stem + song + ring
    # the body leans slightly to the left
    return body * amp([[.9], [-.9]]) + hiss * chatter(angle, depth=0.079) + scrapes()


def scene():
    """Felling, then an abrupt change to cutting up the trunk, over the steady yard."""
    later = np.clip((TIME - JUMP_S) / 0.00064, 0, 1)
    first = insects() + steps() + crown() + hinge() + felling()
    return yard() + (1 - later) * first + later * bucking()


def record(dry):
    """Weaken what the channels share near 10 kHz, leaving them opposed there, and cut all above the band limit."""
    left, right = dry
    pair = np.array([left + right, left - right]) / 2

    def response(hz):
        gains = np.array([amp(along(SHARED_DIP, hz)), np.ones_like(hz)])
        return gains * (hz < TOP_HZ)
    mid, side = filtered(pair, response)
    return np.array([mid + side, mid - side])


dry = scene()
out = record(dry)
wav_record(out)
```